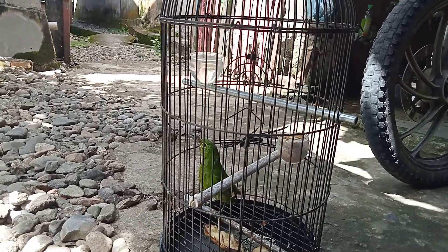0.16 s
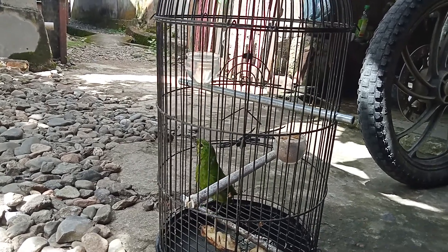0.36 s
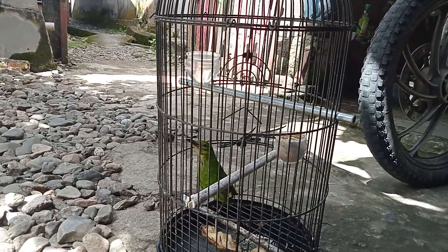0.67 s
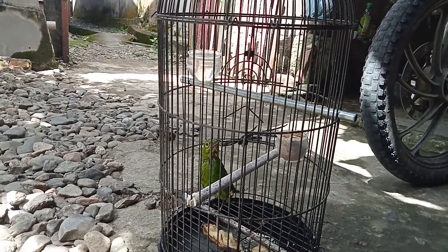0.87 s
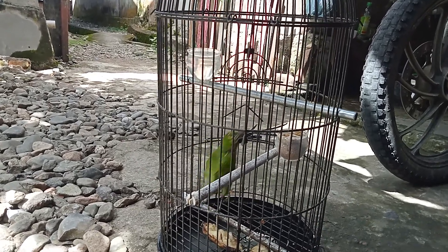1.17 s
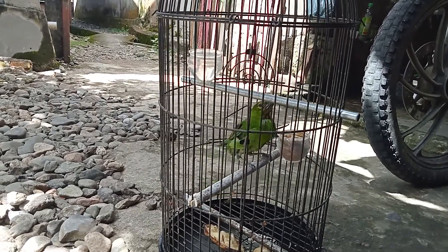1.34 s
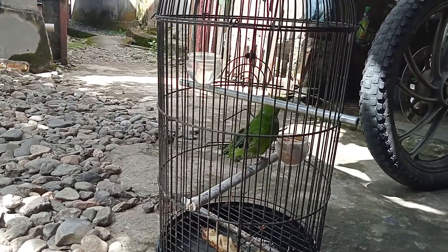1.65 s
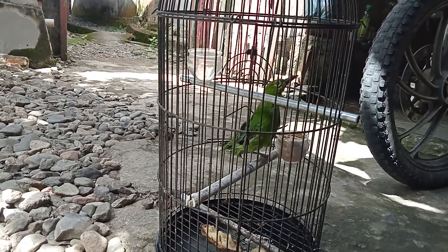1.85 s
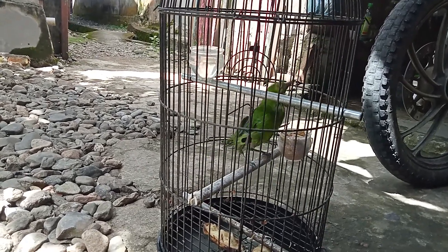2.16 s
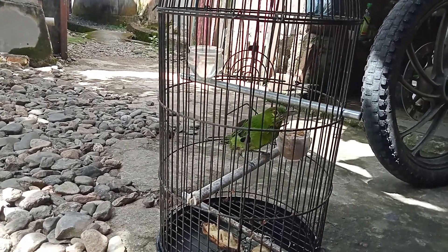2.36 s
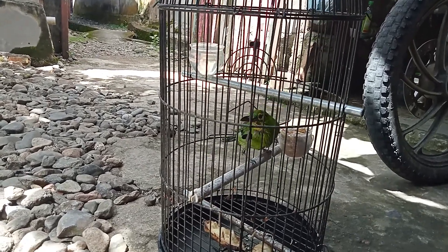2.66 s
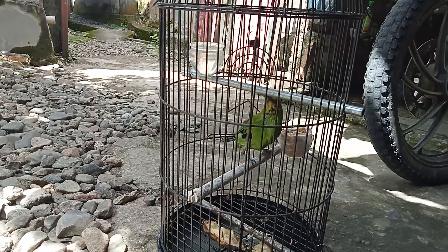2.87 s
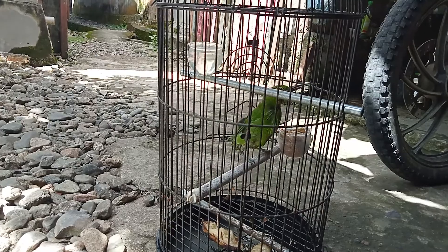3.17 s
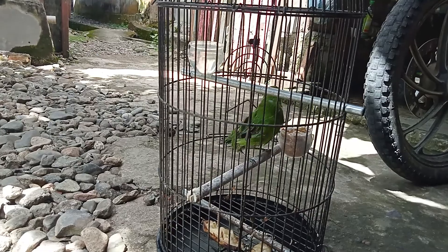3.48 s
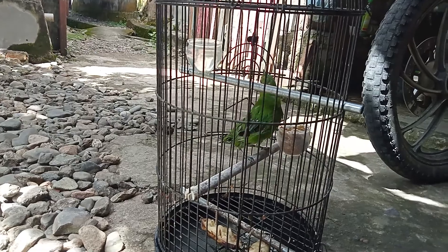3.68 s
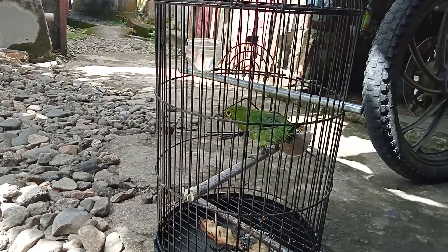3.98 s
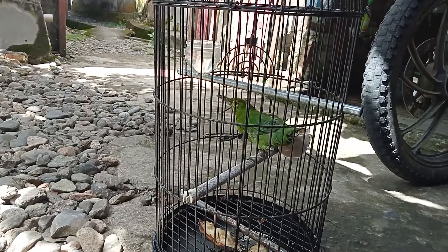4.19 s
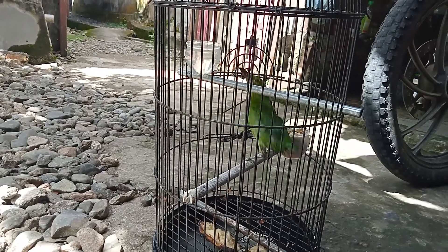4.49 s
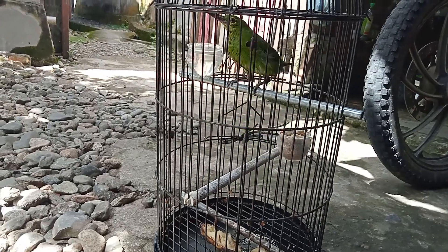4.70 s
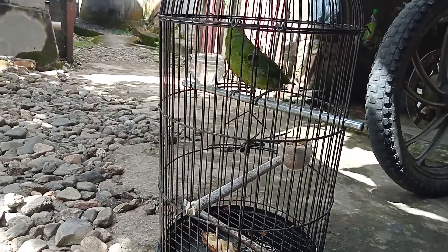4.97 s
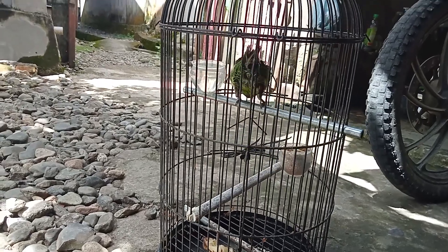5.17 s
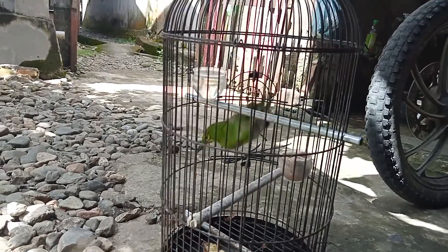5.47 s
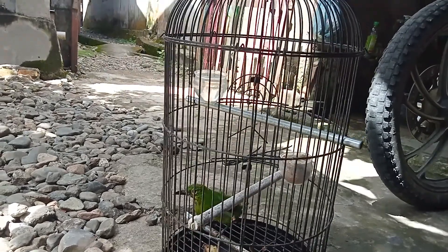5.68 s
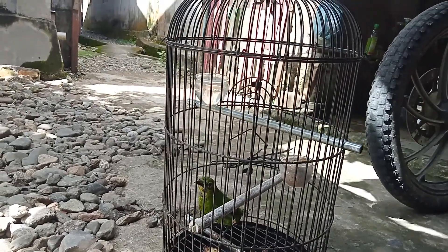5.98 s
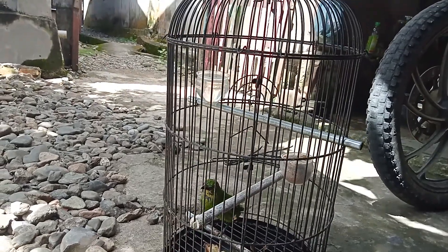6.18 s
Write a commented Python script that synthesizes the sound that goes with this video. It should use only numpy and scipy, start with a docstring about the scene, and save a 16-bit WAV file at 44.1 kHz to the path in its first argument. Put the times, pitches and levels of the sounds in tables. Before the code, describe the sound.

A caged songbird whistles, chips, rasps and buzzes loudly close by, while a second bird slurs upward farther off in a small hard-walled yard.

```python
"""A small walled yard: a caged leafbird sings close to the microphone, a second bird is further off.
The near bird whistles, chips and buzzes with harmonic voices and rasps with both sides of its syrinx.
The second bird's slurs climb and level off. Scattered reflections make the yard's answer to each note.
Filtered noise gives open air and a high hiss, wandering sines a faint hum, soft pips a distant call."""
import sys
import numpy as np
from scipy import signal
from scipy.fft import rfft, irfft, next_fast_len
from scipy.io import wavfile
from scipy.ndimage import uniform_filter1d, minimum_filter1d

SR = 44100
rng = np.random.default_rng(int(sys.argv[2]) if len(sys.argv) > 2 else 0)


def output_pcm(signal):
    """Save a mono or channel-first signal as 16-bit PCM at the path in sys.argv[1].

    Samples are clipped to [-1, 1] before scaling.
    """
    pcm = np.clip(np.atleast_2d(signal).T, -1, 1) * 32767
    wavfile.write(sys.argv[1], SR, np.round(pcm).astype(np.int16))


N = 279594
TIME = np.arange(N) / SR


def from_db(db):
    """Decibels to amplitude gain."""
    return 10 ** (np.asarray(db) / 20)


def rms_one(x):
    """Scale to rms 1."""
    return x / np.sqrt(np.mean(x ** 2) + 1e-20)


def colour(x, spectrum):
    """Filter by a curve of f/Hz, level/dB, interpolated over log frequency."""
    hz, db = np.transpose(spectrum)
    bins = np.linspace(1, SR / 2, len(x) // 2 + 1)
    gain = from_db(np.interp(np.log(bins), np.log(hz), db))
    return irfft(rfft(x) * gain, len(x))


def flutter(size, rate_hz):
    """Smooth random wander of rms 1: white noise through a double one-pole low-pass."""
    r = np.exp(-2 * np.pi * rate_hz / SR)
    noise = rng.standard_normal(size + SR // 10)  # the extra lead-in lets the filter settle
    return rms_one(signal.lfilter([1], [1, -2 * r, r * r], noise)[-size:])


def add(out, start, note):
    """Place a note at its start time in seconds."""
    at = max(int(start * SR), 0)
    out[at:at + len(note)] += note[:N - at]


def progress(length):
    """Runs from 0 to 1 over a note of this many seconds."""
    return np.linspace(0, 1, int(length * SR))


def gate(size, edge_s=0.001):
    """The airflow opens and shuts along smooth cosine edges."""
    return signal.windows.tukey(size, min(1, 2 * edge_s * SR / size))


def phase_of(hz, rough, tremble=0.0035, jitter=0.15):
    """One side of the syrinx: a slight pitch tremble, and fast jitter when it is rough."""
    unsteady = tremble * flutter(len(hz), 100) + jitter * rough * flutter(len(hz), 740)
    return 2 * np.pi * np.cumsum(hz * (1 + unsteady)) / SR


def turbulence(phase, grit_db=4):
    """Throat noise escapes in uneven spurts, swelling once in each cycle of the valve."""
    # noise colour in the throat: f/Hz, relative level/dB per Hz
    throat_noise = [(500, -24), (1400, -15.5), (2100, 18), (6000, 20.5), (9500, -24.5), (15000, -25)]
    size = len(phase)
    noise = rms_one(colour(rng.standard_normal(next_fast_len(size)), throat_noise)[:size])
    return noise * (1 + .5 * np.sin(phase)) * from_db(grit_db * flutter(size, 470))


def voice(hz, db, rough, harmonics_db, noise_db=-9, onset_overtone=0, edge_s=0.003534, shimmer_db=6,
          flicker_db=3):
    """One syrinx voice with its harmonics; roughness shakes its strength and adds air noise."""
    size, phase = len(hz), phase_of(hz, rough)
    partials = []
    for k, harmonic_db in enumerate(harmonics_db, 1):
        below_nyquist = k * hz < SR / 2
        partials.append(from_db(harmonic_db) * np.sin(k * phase) * below_nyquist)
    # the beak opens widest in mid-note and lets out the upper harmonics
    gape = 0.15 + 1.443 * np.sin(np.linspace(0, np.pi, size)) ** 2
    upper = sum(partials[2:]) * gape * from_db(flicker_db * flutter(size, 200))
    # the valve swings lopsidedly while it starts, which brings out the octave
    octave = onset_overtone * np.exp(-(TIME[:size] / 0.0282) ** 2) * np.sin(2 * phase)
    air_noise = rough * from_db(noise_db) * turbulence(phase)
    tone = sum(partials[:2]) + upper + octave + air_noise
    return tone * from_db(db + shimmer_db * rough * flutter(size, 480)) * gate(size, edge_s)


def glide(length, start_hz, end_hz, bend_s, bend_hz, half_width_s=0.026):
    """Pitch slides evenly from start to end, with one smooth dip or lift added."""
    u = progress(length)
    bend = bend_hz * np.exp(-((u * length - bend_s) / half_width_s) ** 2)
    return start_hz + (end_hz - start_hz) * u + bend


def background(air_db=-29.0, waver_db=3.5, hum_db=13):
    """Open air, a wavering high hiss and the hum of a far motor, its sines wandering in phase."""
    # yard air: f/Hz, relative level/dB per Hz
    air_curve = [(25, -15.5), (60, 8.5), (100, 5), (170, 17), (300, 10.5), (520, 13), (630, 27),
                 (760, 13.5), (1250, 11), (2200, 15.5), (3300, 6.5), (4600, -0.5), (7800, 1.5),
                 (10600, -0.5), (15500, 2.5)]
    # colour of the high hiss: f/Hz, relative level/dB
    hiss_curve = [(4000, -31), (5000, -3), (5700, 9.5), (6100, 3.5), (6700, -5), (7100, -27), (9000, -22)]
    # strength of the hiss ahead of its waver: t/s, level/dB
    hiss_level = [(0, -28), (.4, -45), (.68, -21.5), (.9, -44), (1.25, -38.5), (2.0, -35), (2.8, -20.5),
                  (3.5, -46), (5.85, -44), (6.1, -34), (6.34, -32)]
    # hum partials: f/Hz, rms level/dB before the common hum_db lift
    hum_partials = [(102.3, -61.5), (150.7, -56), (199.2, -59.5), (344.5, -63), (629.8, -51)]
    size = next_fast_len(N)
    air = from_db(air_db) * rms_one(colour(rng.standard_normal(size), air_curve)[:N])
    hiss = rms_one(colour(rng.standard_normal(size), hiss_curve)[:N])
    hiss = hiss * from_db(np.interp(TIME, *np.transpose(hiss_level)) + waver_db * flutter(N, 24))
    hum = np.zeros(N)
    for hz, db in hum_partials:
        phase = 2 * np.pi * hz * TIME + .7 * flutter(N, 3.0)
        hum += from_db(db + hum_db) * np.sqrt(2) * np.sin(phase)
    return air + hiss + hum


def slurs(start_hz=1297.1, bend=2.8, onset_db=-16, level_db=2):
    """The second bird's pitch climbs steeply and levels off; early and late levels shape each note."""
    # slurs: t/s, length/s, top f/Hz, nominal early level/dB, nominal top level/dB
    slur_notes = [ (.0, .038, 2263, -15.5, -21), (1.549, .077, 3126, -7, -2), (1.699, .072, 2917, -9, -3),
                  (1.856, .072, 2955, -8, -5), (2.02, .080, 2983, -4.5, -5.5),
                  (2.183, 0.031, 3031, -29, -9), (2.371, .078, 2957, -22.5, -18.5),
                  (2.548, .07, 2777, -16.5, -16), (3.796, .062, 2859, -16, -4),
                  (3.969, 0.06, 2949, -11.5, -0.5), (4.112, 0.084, 3047, -9.5, -8),
                  (4.276, 0.052, 3103, -7.5, -1.5), (4.431, .082, 3063, -12, -5.5),
                  (4.59, 0.082, 3000, -15, -9), (4.809, 0.086, 3000, -14.5, -5),
                  (4.999, .11, 2369, -19, -10.5)]
    # harmonics from the first up: relative level/dB
    harmonics_db = [5, -44.5, -28, -33.5]
    out = np.zeros(N)
    for s, length, top_hz, first_db, top_db in slur_notes:
        u = progress(length)
        hz = top_hz + (start_hz - top_hz) * (1 - u) ** bend
        early = [first_db + onset_db, first_db - 2.5, first_db + 5]
        late = [top_db - 7.5, top_db + 1, top_db - 19.5]
        db = np.interp(u, [0, .13, .22, .36, .65, 1], early + late)
        add(out, s, voice(hz, db + level_db, 0.01, harmonics_db, noise_db=-10.5))
    return out


def cut_lows(x):
    """A steep high-pass: nothing sounds below about 1.1 kHz."""
    return signal.sosfilt(signal.butter(6, 1150, "high", fs=SR, output="sos"), x)


def yard(x, echoes, unevenness_db=4, likelihood=.2):
    """Scattered reflections of uneven size, their mean strength set by the delay."""
    delay, db = np.transpose(echoes)
    t = TIME[TIME < delay[-1]]
    samples_per_ms = SR / 1000
    taps = rng.standard_normal(len(t)) * (rng.random(len(t)) < likelihood)
    taps = rms_one(taps * from_db(unevenness_db * np.tanh(flutter(len(t), 280))))
    decay = from_db(np.interp(t, delay, db)) * (t > delay[0])
    response = taps * decay / np.sqrt(samples_per_ms)
    return signal.fftconvolve(x, response)[:N]


def whistles(notes, harmonics_db, rough, onset_overtone=0, noise_db=-15, edge_db=21):
    """Held notes: a quick swell, a slowly sagging hold and a quick release."""
    attack_s, release_s, sag_db_per_s = 0.0181, 0.011, 7
    out = np.zeros(N)
    for s, length, start_hz, end_hz, bend_s, bend_hz, db, overtones_db in notes:
        t = progress(length) * length
        swell = np.maximum(1 - t / attack_s, 0)
        release = np.maximum(1 - (length - t) / release_s, 0)
        level = db - edge_db * (swell + release) - sag_db_per_s * t
        harmonics = [harmonics_db[0]] + [h + overtones_db for h in harmonics_db[1:]]
        hz = glide(length, start_hz, end_hz, bend_s, bend_hz)
        octave = onset_overtone * from_db(overtones_db)
        add(out, s, voice(hz, level, rough, harmonics, noise_db, octave, edge_s=0.0013))
    return out


def chips(bend=1.6, fade_db=13, attack_s=0.012, attack_db=8, puff_db=-27):
    """Pitch drops fast, then flattens as the note fades; a thin puff of air leaves the beak with it."""
    # falling chips: t/s, length/s, start f/Hz, end f/Hz, nominal level/dB, roughness/0-1
    chip_notes = [ (0.189, 0.028, 6900, 1850, 4.5, 0.4), (0.515, 0.025, 7400, 1915, -4, 0.2),
                  (0.612, .030, 4579, 2048, 7, 0.4), (0.958, 0.032, 4512, 2050, 0.5, 0.06),
                  (1.066, 0.036, 3572, 2004, 17, 0.06), (1.254, 0.026, 4345, 2064, 12, .05),
                  (2.113, 0.0061, 6247, 5194, 18.5, 0.3), (2.869, 0.0087, 4425, 1895, -15.5, 0.48),
                  (3.058, 0.0074, 3846, 1750, -8.5, 0), (3.251, 0.018, 5733, 1667, -17, 0.48),
                  (5.039, 0.024, 5601, 2640, -0.5, 0.63), (5.359, .019, 7035, 2775, -2.5, 0.45),
                  (5.777, 0.027, 4465, 2188, 4, .1), (5.792, 0.03044, 2159, 2084, -4.5, 0.17)]
    # harmonics from the first up: relative level/dB
    harmonics_db = [1, -30, -19.5, -47]
    puff_band = signal.butter(4, [5500, 11000], "band", fs=SR, output="sos")
    out = np.zeros(N)
    for s, length, start_hz, end_hz, db, rough in chip_notes:
        u = progress(length)
        fall = (1 - np.exp(-bend * u)) / (1 - np.exp(-bend))
        hz = start_hz + (end_hz - start_hz) * fall
        level = db + 2 - fade_db * u - attack_db * np.maximum(1 - u * length / attack_s, 0)
        puff = rms_one(signal.sosfilt(puff_band, rng.standard_normal(len(u))))
        add(out, s, voice(hz, level, rough, harmonics_db, noise_db=-2))
        add(out, s, puff * from_db(db + puff_db) * np.sin(np.pi * u))
    return out


def piping(rough=0.11, rise=0.021):
    """Soft, rounded distant pips that rise by a small share of their pitch."""
    # distant piping: t/s, length/s, middle f/Hz, level/dB
    pip_notes = [(1.15, 0.072, 2191, -25.5), (1.957, .06, 3655, -25.5), (5.281, .07, 2398, -13.5),
                 (5.925, 0.066, 2182, -24.5), (6.118, 0.0416, 2181, -16.5), (6.238, 0.033, 2176, -13.5)]
    out = np.zeros(N)
    for s, length, middle_hz, db in pip_notes:
        hz = middle_hz * (1 + rise * (progress(length) - .5))
        add(out, s, voice(hz, db, rough, [0], noise_db=-3.0, edge_s=0.018))
    return out


def rasps(scoop=0.089, droop=.22, swell_db=4, noise_db=-20, overtones_db=-13):
    """Two voices share one airway and modulate each other, giving sum tones and overtones."""
    # two-voiced rasps: t/s, length/s, low voice nominal f/Hz, high voice nominal f/Hz,
    # end pitch before the droop/share of nominal, nominal level/dB, roughness/0-1
    rasp_notes = [ (2.137, 0.076, 2447, 3856, 0.898, -4, 0), (2.222, 0.084, 2499, 3571, 0.894, -4.5, 0),
                  (2.354, .072, 2422, 3397, 0.95, 0, 0.2), (2.461, 0.061, 2408, 3532, 0.944, -4, 0.1),
                  (2.583, 0.055, 2426, 3675, .88, 2, 0.2), (2.702, 0.059, 2467, 3404, 0.93, 6.5, 0)]
    out = np.zeros(N)
    for s, length, low_hz, high_hz, end_share, db, rough in rasp_notes:
        u = progress(length)
        arch = 1 + (end_share - 1) * u - scoop * np.exp(-u / 0.12) - droop * np.exp((u - 1) / 0.073)
        low = phase_of(low_hz * arch, rough)
        high = phase_of(high_hz * arch, rough, tremble=0.014)
        flow = 1.53 * np.sin(low) + 1.3 * np.sin(high)
        flow += 2.785 * np.sin(2 * low) + 1.98 * np.sin(low + high) + 0.985 * np.sin(2 * high)
        flow += 0.266 * (np.sin(2 * low + high) + np.sin(4 * low) + np.sin(2 * low + 2 * high))
        # the beak opens in mid-note and lets out the highest sum tones
        orders = [(3, 1), (0, 3), (1, 3), (4, 1), (3, 2), (0, 4), (6, 0)]
        highest = sum(np.sin(m * low + n * high) for m, n in orders)
        flow += from_db(overtones_db) * np.sin(np.pi * u) * highest
        # the air noise is strongest as the note starts and as it breaks off
        flow += from_db(noise_db) * (1 + 3 * (2 * u - 1) ** 4) * turbulence(low)
        level = from_db(db + swell_db * (u - 4.5))
        add(out, s, rms_one(flow) * level * gate(len(u), edge_s=0.0019))
    return out


def thin_whistles(bend=1.6, rough=0.08, climb_rough=.2, climb_share=.68, swell_db=30):
    """The note grows louder and purer as it nears its top pitch, strongest on its second harmonic."""
    # thin whistles: t/s, length/s, start f/Hz, top f/Hz, level at the top/dB
    thin_notes = [(2.88, 0.0677, 1796, 2867, 7), (3.062, .078, 1947, 2946, 5), (3.269, .14, 2111, 2567, 5)]
    # harmonics from the first up: relative level/dB
    harmonics_db = [-18, 0.5, -31, -34.5, -39, -20.5]
    out = np.zeros(N)
    for s, length, start_hz, top_hz, db in thin_notes:
        to_go = np.maximum(1 - progress(length) / climb_share, 0) ** bend
        hz = top_hz + (start_hz - top_hz) * to_go
        level = db - swell_db * np.sqrt(to_go)
        add(out, s, voice(hz, level, rough + climb_rough * to_go, harmonics_db, noise_db=-24))
    return out


def buzzes(level_db=-6, clear_db=-3, attack_s=.028, swell_db=8.5, onset_rough=0.55):
    """Slow syrinx pulsing, part steady, part ragged; the throat favours the third to fifth harmonics."""
    # nasal buzzes: t/s, length/s, start pulse rate f/Hz, end pulse rate f/Hz,
    # bend after t/s, bend f/Hz, nominal level/dB, roughness/0-1
    buzz_notes = [(3.556, 0.1417, 688.7, 715.5, .047, 60, 1.5, .3),
                  (3.894, 0.12, 690.3, 834.8, .028, -36, -4, 0.12)]
    # harmonics from the first up, ragged part: relative level/dB
    ragged_db = [-57.5, -34, -3, -4, -1, -13, -9.5, -18.5, -17, -25.5, -17.5, -17.5, -32, -24]
    # harmonics from the first up, steady part: relative level/dB
    steady_db = [-60, -29.5, -2, -4, -16.5]
    out = np.zeros(N)
    for s, length, start_hz, end_hz, bend_s, bend_hz, db, rough in buzz_notes:
        # each buzz starts soft and ragged
        starting = np.maximum(1 - progress(length) * length / attack_s, 0)
        hz = glide(length, start_hz, end_hz, bend_s, bend_hz)
        level = db - swell_db * starting
        raggedness = rough + onset_rough * starting
        add(out, s, voice(hz, level + level_db, raggedness, ragged_db, noise_db=-8.5, shimmer_db=6))
        add(out, s, voice(hz, level + clear_db, 0, steady_db, flicker_db=2.5))
    return out


def scene(song_db=4, second_bird_db=3, piping_echo_db=-0.5):
    """The near singer, the second bird and the distant pips, with their echoes and the background."""
    # pure whistles: t/s, length/s, start f/Hz, end f/Hz (both before the bend),
    # bend after t/s, bend f/Hz, level/dB, overtone level/dB
    whistle_notes = [ (.07, .11, 1269, 1852, 0.038, 27.5, -13.5, -36),
                     (.327, 0.1088, 3357, 3524, .053, -120, 3, -6),
                     (.727, .131, 3406, 3605, .096, -410, 5, -2),
                     (4.16, .118, 2752, 3264, 0.04263, 372.5, 4, 2),
                     (4.40, .10, 3285, 3294, 0.0472, -150, 1.5, 1.5),
                     (4.597, .108, 3067, 3045, 0.0539, -170, -9, 0.5),
                     (4.708, 0.0471, 2951, 2865, 0.0283, 19.5, -0.5, -21.5),
                     (4.806, 0.099, 2796, 2802, 0.044, 194, -4, 3),
                     (4.912, 0.028, 2884, 2825, 0.0282, 17.5, 4.5, -22.5),
                     (5.162, .084, 2907, 3561, 0.0554, -210, 6, -3.5),
                     (5.499, .096, 2885, 3491, 0.04728, -150, 2.5, -3.5)]
    # harmonics of the whistles from the first up: relative level/dB
    whistle_harmonics = [1.5, -29, -13.5, -38.5]
    # the hoarse note that ends the first buzz, columns as for the whistles
    hoarse_note = [(3.672, .072, 2595, 2796, 0.03, 327.8, -7.5, 0.0008)]
    # beak turned away from the microphone, more sound goes to the walls: t/s, echo level/dB
    beak_turn = [(0, -0.5), (1.3, -3), (2.3, 0), (3.15, 3), (3.6, -1.5), (4.5, -3.5), (5.2, 7.5), (5.8, -2)]
    # cage and ground answer first, then the walls: delay t/s, echo energy level/dB per ms
    near_answer = [(.001, 3.5), (.01, -17.5), (0.021, -16), (.032, -28), (0.049, -39), (0.06, -26.5),
                   (.08, -32), (.1, -43), (.18, -51), (.3, -65.5), (.6, -101.5)]
    # the second bird is heard largely off the walls: delay t/s, echo energy level/dB per ms
    far_answer = [(.002, -10.5), (.015, -16.5), (.05, -25.5), (.1, -30.5), (.125, -24.5), (.145, -31.5),
                  (.168, -26), (0.188, -44), (.6, -74)]
    song = whistles(whistle_notes, whistle_harmonics, rough=.03, onset_overtone=0.276) + thin_whistles()
    song = song + whistles(hoarse_note, [10.5, -4.0, -9, -25.5], rough=0.26, noise_db=-13)
    song = from_db(song_db) * cut_lows(song + chips() + rasps() + buzzes())
    second_bird = from_db(second_bird_db) * cut_lows(slurs())
    pips = piping()
    toward_walls = song * from_db(np.interp(TIME, *np.transpose(beak_turn)))
    echoes = yard(toward_walls, near_answer)
    far_echoes = yard(second_bird + from_db(piping_echo_db) * pips, far_answer)
    return (song + second_bird + pips + echoes + far_echoes + background())[None]


def record(dry, ceiling_db=2.0, release_db_per_s=200, split_hz=780, cutoff_hz=15600):
    """A limiter holds down the band above the hum; then microphone colour, clipping and a cut top."""
    # microphone colour: f/Hz, level/dB
    mic_curve = [(600, -19.5), (1400, -10), (1800, -17), (2100, -4), (2550, -11), (2900, -6.5), (3350, -3),
                 (4400, -12.5), (5200, -10.5), (5900, -1), (6400, -6), (7100, -13), (10000, -17),
                 (11500, -23), (15000, -29)]
    low = signal.sosfiltfilt(signal.butter(4, split_hz, fs=SR, output="sos"), dry[0])
    high = dry[0] - low
    over = np.maximum(20 * np.log10(np.abs(high) + 1e-9) - ceiling_db, 0)
    # the hold lets go at a constant rate in dB
    release = release_db_per_s * TIME
    held = np.maximum.accumulate(over + release) - release
    # the gain is smoothed over about a millisecond
    gain_db = uniform_filter1d(minimum_filter1d(-held, size=45), size=45)
    limited = low + high * from_db(gain_db)
    padding = next_fast_len(N + SR // 10) - N
    heard = colour(np.pad(limited, (0, padding)), mic_curve)[:N]
    top_cut = signal.ellip(10, .2, 80, cutoff_hz, fs=SR, output="sos")
    return signal.sosfilt(top_cut, np.clip(heard, -.9, .9))[None]


dry = scene()
out = record(dry)
output_pcm(out)
```